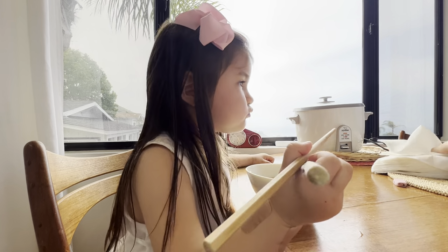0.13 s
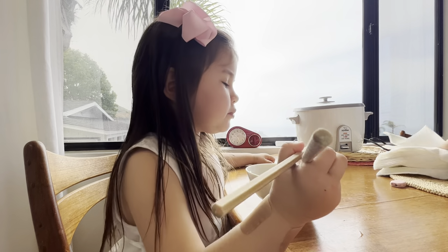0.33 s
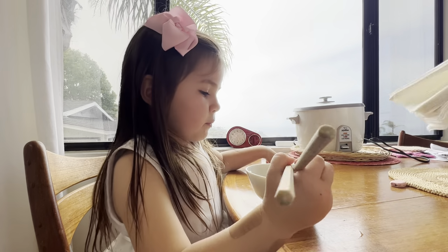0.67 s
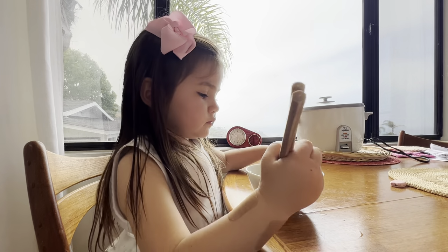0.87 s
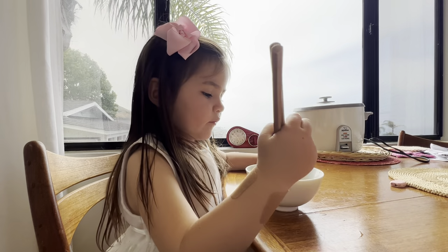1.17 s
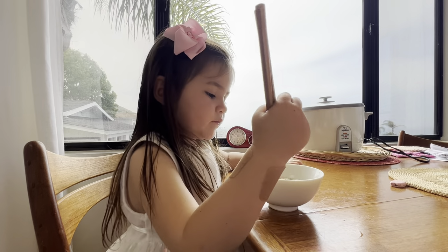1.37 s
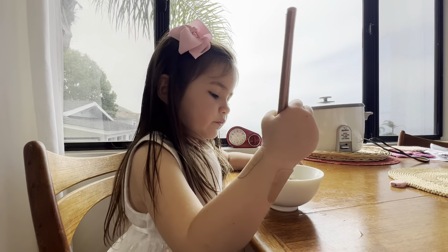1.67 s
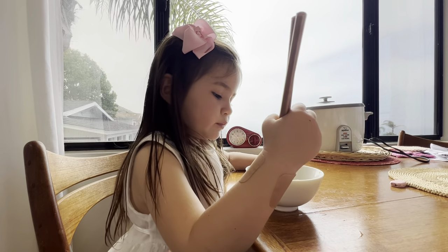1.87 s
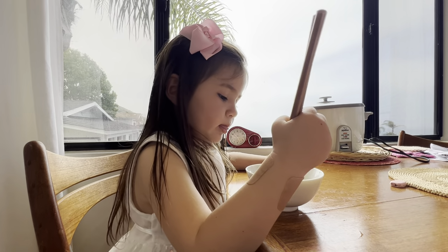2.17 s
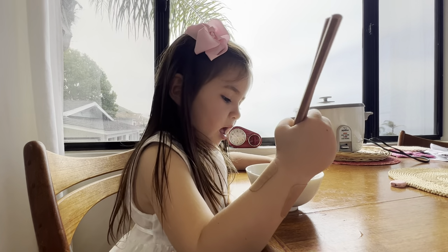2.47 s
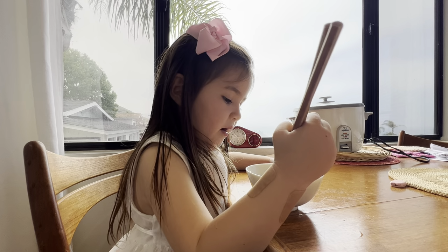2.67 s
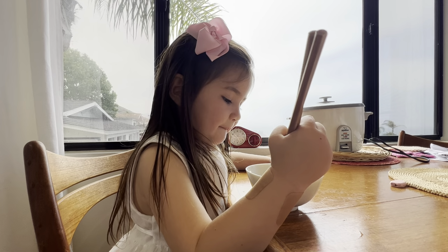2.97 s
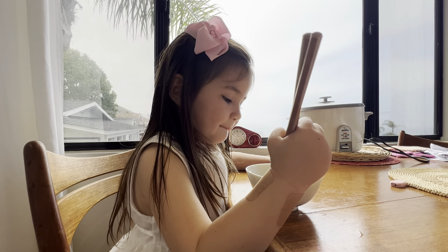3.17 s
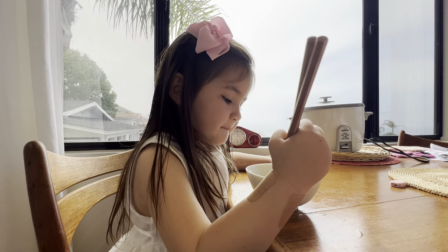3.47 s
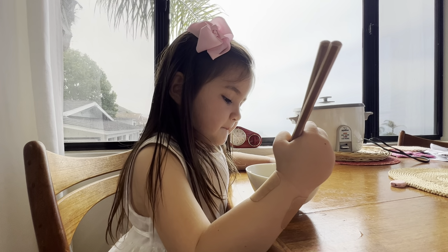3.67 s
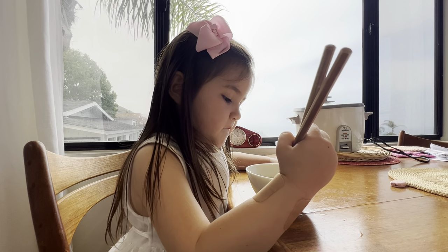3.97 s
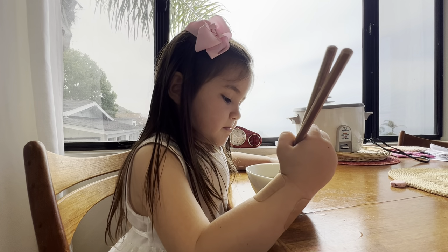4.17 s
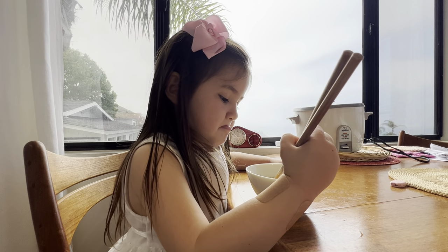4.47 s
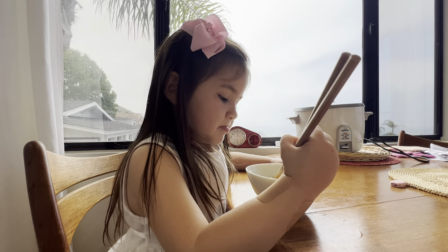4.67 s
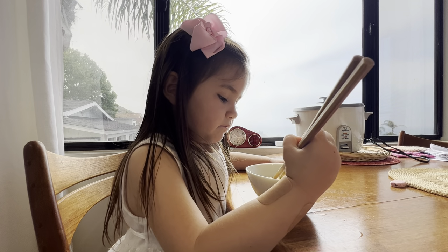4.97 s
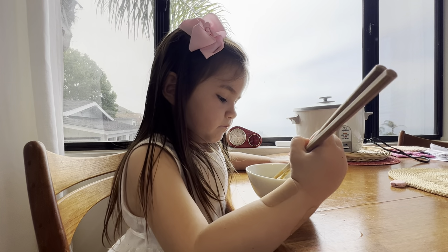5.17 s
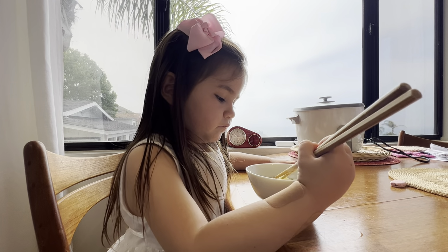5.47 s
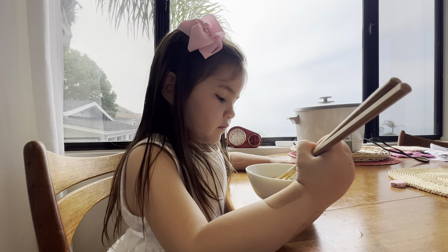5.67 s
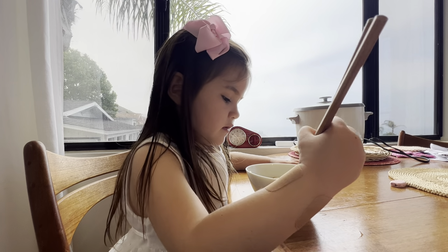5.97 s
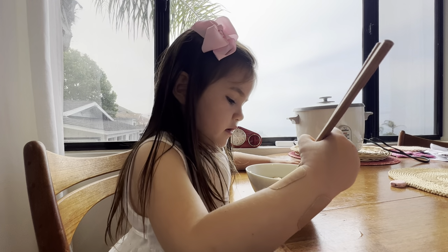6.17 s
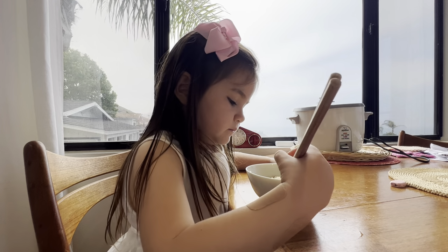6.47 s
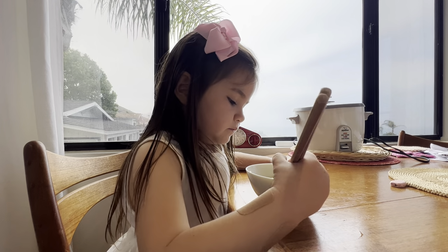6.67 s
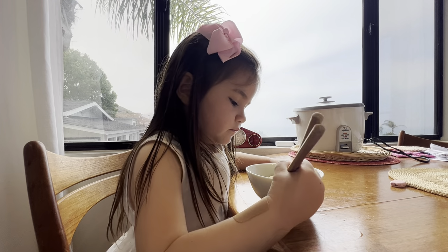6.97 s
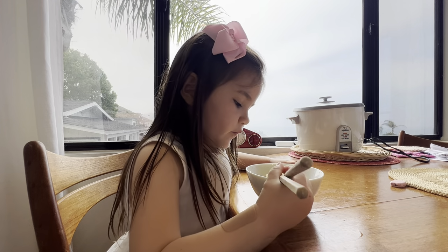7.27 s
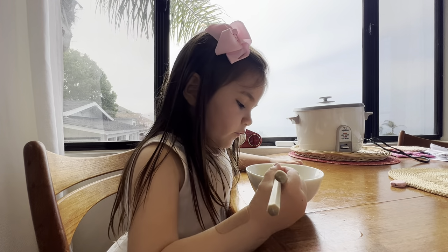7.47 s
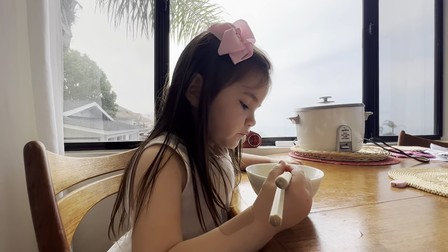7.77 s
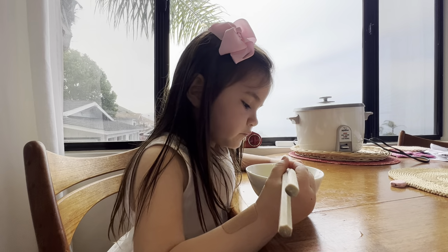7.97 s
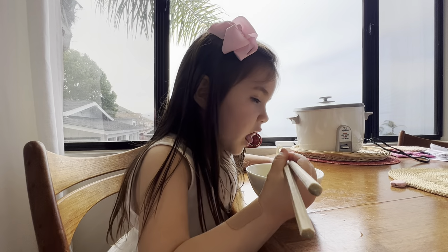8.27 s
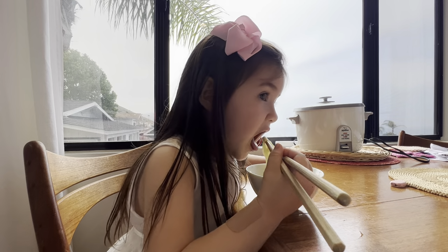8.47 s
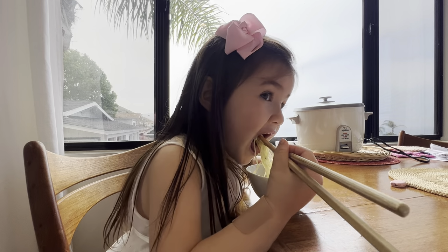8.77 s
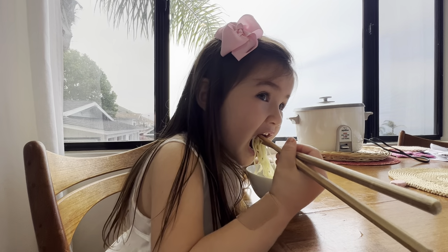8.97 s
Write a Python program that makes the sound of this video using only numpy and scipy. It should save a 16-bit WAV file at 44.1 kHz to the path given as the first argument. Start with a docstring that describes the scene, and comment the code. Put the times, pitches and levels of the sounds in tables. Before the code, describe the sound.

Close quiet handling sounds at a wooden table: fabric rustle, one napkin snap, a low thump, chopsticks skidding and tapping against a bowl.

```python
"""Cloth and skin rustle close by in a quietly humming room; dry ticks and chopsticks on a ceramic bowl follow.
A napkin is shaken out, something heavy lands on a wooden table, and the sticks strike and scrape the bowl.
Friction is coloured noise under gesture envelopes; taps and thuds are sums of decaying tones; ticks are
short dispersed noise bursts. A phone's two microphone ports, an arm's length away, hear the treble differently."""
import sys
import numpy as np
from scipy import signal
from scipy.fft import rfft, irfft
from scipy.io import wavfile
from scipy.ndimage import uniform_filter1d

SR = 44100
rng = np.random.default_rng(int(sys.argv[2]) if len(sys.argv) > 2 else 0)


def generate_wav(sig):
    """Save sig (samples, or channels by samples) to the path in sys.argv[1] as 16-bit PCM at SR."""
    pcm = np.round(np.clip(np.atleast_2d(sig).T, -1, 1) * 32767).astype(np.int16)
    wavfile.write(sys.argv[1], SR, pcm)


N = 401744
T = np.arange(N) / SR  # time of each sample, s
HZ = np.maximum(np.arange(N // 2 + 1) * SR / N, 1)  # frequency of each spectral bin


def amp(db):
    """Level to gain: twenty decibels are a factor of ten in pressure."""
    return 10 ** (np.asarray(db) / 20)


def over_hz(table):
    """Frequency response: (frequency, value) points joined along a logarithmic frequency axis."""
    hz, value = np.transpose(table)
    return np.interp(np.log(HZ), np.log(hz), value)


def colour(x, table):
    """Linear filtering: shape the spectrum of x by a table, then scale to rms 1."""
    y = irfft(rfft(x) * amp(over_hz(table)), N)
    return y / np.sqrt(np.mean(y ** 2))


def partly_shared(a, b, likeness):
    """Correlation: mix independent a and b into a partner of a with the given likeness and equal power."""
    return likeness * a + np.sqrt(1 - likeness * likeness) * b


def walk(rate):
    """Slow modulation: random levels held for 1 / rate seconds and smoothed twice."""
    hold = int(SR / rate)
    steps = np.repeat(rng.standard_normal(N // hold + 1), hold)
    return 1.66 * uniform_filter1d(uniform_filter1d(steps, hold), hold)[:N]


def grit(scatter_db, likeness, lag_ms):
    """Friction noise: grains of uneven size, partly shared by the ports, the left one lag_ms late."""
    grains = np.minimum(rng.exponential(size=N // 40 + 1), 3)
    size = amp(scatter_db * uniform_filter1d(np.repeat(grains, 40)[:N], size=30))
    a, b = rng.standard_normal((2, N))
    left = np.roll(a * size, int(lag_ms * SR / 1000))
    return np.array([left, partly_shared(a, b, likeness) * size])


def gesture(t, s, length, db, grows, rise, fall):
    """Exponential envelope: rises to its start, grows while it lasts, falls after; slopes in dB per second."""
    end = s + length
    growth_db = grows * (end - np.clip(t, s, end))
    return amp(db - growth_db - rise * np.clip(s - t, 0, 1) - fall * np.clip(t - end, 0, 1))


def together(rows, grows, rise, fall):
    """Incoherent addition: the powers of (start [s], length [s], level [dB]) gestures sum."""
    t = T[::32]
    power = sum(gesture(t, s, length, db, grows, rise, fall) ** 2 for s, length, db in rows)
    return np.interp(T, t, np.sqrt(power))


def ring(hz, db, decay, signs):
    """Modal superposition: decaying sines of a struck body, peak 1; decay in dB per second."""
    t = T[:SR // 2, None]
    y = (signs * amp(db - decay * t) * np.sin(2 * np.pi * hz * t)).sum(axis=1)
    return y / np.abs(y).max()


def add(out, s, sound, pan_db, lag_ms):
    """Level and time differences: place a hit at s; left delayed by lag_ms, right by a fixed 0.12 ms."""
    for side, sign, late in ((0, 0.91, lag_ms / 1000), (1, -1.1, 0.00012)):
        i = int((s + late) * SR)
        out[side, i:i + len(sound)] += amp(sign * pan_db / 2) * sound[:N - i]


def room_tone():
    """Diffuse field: noise shared by the ports in the bass, opposed near 800 Hz by their spacing."""
    # likeness of the ports: (frequency [Hz], left-right correlation)
    room_likeness = [(200, 0.85), (400, 0.12), (800, -0.39), (1500, -0.07), (3000, -0.08)]
    # relative spectra of the layers: (frequency [Hz], density [dB per Hz])
    rumble_tone = [(20, -41), (35, -7.5), (64, -2.5), (107, -4), (160, -12), (220, -28), (300, -72)]
    drone_tone = [(110, -43), (170, -7), (205, -3.5), (222, 5), (245, -3), (300, -8), (450, -18.5),
                  (600, -47)]
    air_tone = [(240, -28), (400, -15), (854, -6), (1200, -9.5), (1500, -13.5), (3000, -37), (3900, -54.5),
                (6600, -120)]
    band_tone = [(600, -33), (700, 1.5), (730, 5), (790, -1.5), (850, -24), (980, -60)]
    hiss_tone = [(1500, -21), (2500, -19), (4300, -8.5), (6400, -4), (7350, 6), (8200, -7), (9300, -6),
                 (10500, -42), (12000, -50.5)]
    # rumble, drone and air, slowly growing quieter: (level at the start [dB], fall [dB/s], flicker [dB])
    room_layers = [(-56.5, 0.6, 1.5), (-54.5, 1.26, 0.6), (-53.5, 0.92, 0.97)]
    # the bass grows fuller for a while: (start [s], length [s], rumble level [dB])
    bass_swells = [(0, 0.49, -60), (3.45, 0.25, -58), (4.0, 0.42, -63)]
    # a narrow band near 750 Hz swells now and then: (start [s], length [s], level before flicker [dB])
    band_swells = [(1.45, 1, -66), (4.35, 0.31, -63.5), (5.5, 0.27, -61.5)]
    band_rest_db, band_slope_db_per_s, hiss_db = -82.5, 65, -74.5

    a, b = rfft(rng.standard_normal((2, N)))
    likeness = np.clip(over_hz(room_likeness), -1, 1)
    noise = irfft(np.array([a, partly_shared(a, b, likeness)]), N)
    rumble, drone = colour(noise, rumble_tone), colour(noise, drone_tone)
    out = amp(hiss_db) * colour(noise, hiss_tone)
    for (db, fall, flicker_db), layer in zip(room_layers, (rumble, drone, colour(noise, air_tone))):
        out += amp(db - fall * T + flicker_db * walk(6)) * layer
    out += together(bass_swells, 0, 90, 90) * (rumble + amp(-15) * drone)
    band = amp(band_rest_db) + together(band_swells, 0, band_slope_db_per_s, band_slope_db_per_s)
    return out + band * amp(2 * walk(6)) * colour(noise, band_tone)


def rustle():
    """Dry friction: fibres catch and let go by the thousand, in a fine and a coarse grain."""
    # relative spectra of the grains: (frequency [Hz], density [dB per Hz])
    fine_tone = [(2500, -15), (4000, -14), (5400, -7), (7300, -3), (9200, -5), (10300, -17.5),
                 (11500, -28.5), (13500, -51), (15000, -44.5)]
    coarse_tone = [(900, -6), (1600, -6.5), (2500, -10.5), (3600, -13), (4600, -13.5), (7000, -24.5),
                   (10000, -80.5)]
    crisp_tone = [(9000, -31), (11500, -2), (13500, -13), (15200, -0.5)]
    # cloth and skin in light contact, levels before flicker and pan:
    # (start [s], length [s], fine rustle [dB], coarse rub minus fine [dB])
    contact = [(0, 1.475, -64, 1), (1.73, 1.33, -66.5, -2), (3.76, 1.43, -63, -3),
               (5.1, 2.505, -64.5, -2.5), (7.82, 0.59, -66.5, -3)]
    # strokes of cloth and skin sliding, levels at their end before flicker and pan:
    # (start [s], length [s], fine rustle [dB], coarse rub minus fine [dB])
    strokes = [(.05, 0.14, -62, 5.5), (.33, 0.19, -54, 2), (.55, 0.093, -55, -3.5), (.9, 0.12, -56.5, -3),
               (1.1, 0.24, -52, -0.5), (1.82, 0.082, -65, 7.5), (1.93, 0.16, -55, -0.5),
               (2.25, 0.067, -58, -2), (2.43, 0.024, -52.5, 4.5), (2.57, 0.0063, -53, -8),
               (2.68, 0.033, -59.5, -3), (2.78, 0.017, -54.5, -6), (3.06, 0.082, -60, -20),
               (3.2, 0.12, -62.5, -1), (3.33, 0.046, -47.5, -10), (3.43, 0.14, -44, -10.5),
               (3.64, 0.035, -63.5, 0), (3.86, 0.027, -51.5, -6), (3.93, 0.09, -46.5, -13),
               (4.11, 0.048, -60.5, -5), (4.23, 0.1, -54.5, -3), (4.37, 0.22, -45, -6),
               (4.82, 0.084, -52.5, -6.5), (5.07, 0.013, -60.5, -1), (5.26, 0.14, -55, -3.5),
               (5.465, 0.02, -59.5, -14), (5.64, 0.05, -56.5, -27), (5.89, 0.041, -60.5, -26),
               (6.015, 0.017, -59, -4), (6.08, 0.069, -60.5, 2.5), (6.22, 0.16, -57.5, 1.5),
               (6.53, 0.012, -60.5, 0), (6.65, 0.066, -60.5, -2), (6.855, 0.03, -62, -2),
               (6.92, 0.03, -61, -6), (7.09, 0.013, -59, -3), (7.32, 0.084, -54.5, -12),
               (7.49, 0.026, -58.5, -5.5), (7.66, 0.06, -65, -3.5), (7.88, 0.027, -57, -22),
               (8.055, 0.029, -53, -21), (8.15, 0.023, -60, -19), (8.228, 0.049, -48.5, -13),
               (8.315, 0.025, -62, -4)]
    # place of the rustle, before the ports' own difference: (time [s], left minus right [dB])
    rustle_pan = [(0, -8.5), (.8, -9), (2.2, -7), (3, -4), (5.7, -1.4), (7.5, 1.5), (8.2, -4)]
    grows, rise, fall = 17, 278, 297  # dB per second
    crisp_until_s, crisp_db = 1.2, -77.5  # the napkin rustles crisply while it is handled

    def level(coarse):
        """Power sum of contact and strokes, for the fine (0) or coarse (1) grain."""
        gains = []
        for rows, growth in ((contact, 0), (strokes, grows)):
            moves = [(s, length, db + coarse * rub_db) for s, length, db, rub_db in rows]
            gains.append(together(moves, growth, rise, fall))
        return np.hypot(*gains)

    noise = grit(scatter_db=2.0, likeness=0.2, lag_ms=.2)
    cloth = level(0) * colour(noise, fine_tone)
    cloth += level(1) * amp(walk(14)) * colour(noise, coarse_tone)
    cloth += together([(0, crisp_until_s, crisp_db)], 0, rise, fall) * colour(noise, crisp_tone)
    pan_db = np.interp(T, *np.transpose(rustle_pan))
    flicker_db = 0.9 * walk(25)  # all grains flicker together
    return cloth * amp(flicker_db + np.array([pan_db, -pan_db]) / 2)


def napkin():
    """Broadband impulse noise: a crackling flap from the right with a push of air below."""
    # relative spectrum of the flap: (frequency [Hz], density [dB per Hz])
    napkin_colour = [(30, -3.5), (70, -1), (120, -9), (220, -1), (500, -11.5), (1100, -7), (1900, -8),
                     (2900, -16.5), (5800, -13.5), (9500, -24.5), (13500, -36), (15300, -38)]
    start_s, hold_s, rise_db_per_s = 1.172, 0.026, 3000
    flap = colour(grit(scatter_db=2.0, likeness=0.29, lag_ms=.42), napkin_colour)
    snap = gesture(T, start_s, hold_s, -25.5, 0, rise_db_per_s, 338)
    flutter = gesture(T, start_s, hold_s, -35.5, 0, rise_db_per_s, 155)  # loose cloth settles more slowly
    return flap * (snap + flutter) * amp(np.array([[-2.5], [2.5]]))


def thuds():
    """Modal excitation: a heavy thing lands and rocks, the table rings low and unevenly, wood cracks above."""
    # blows on the table top, levels before contact smoothing and bass cut:
    # (time [s], ring peak [dB], push [ms], crack level [dB], crack t60 [s])
    blows = [(2.404, -10.5, 0.6, -27.5, 0.14), (2.409, -9.5, 1.45, -32.5, 0.11),
             (2.426, -8.5, 1.15, -36, 0.23), (2.469, -17, 2.42, -46, 0.44), (2.62, -35.5, 1.6, -62, 0.18)]
    # modes of the table top: (frequency [Hz], relative level [dB], t60 before throbbing [s])
    table_modes = [(120.3, -21, 0.42), (162, -15, 0.34), (175, -10, 0.44), (218, -20, 0.25),
                   (255.4, -2, 0.3), (296.3, -3.5, 0.18), (315, -15, 0.2), (331, -13.5, 0.3),
                   (356.4, -18, 0.27), (412, -21, 0.18), (453, -17, 0.26), (546.4, -13.5, 0.25),
                   (735, -31, 0.21), (825, -17, 0.19), (1380, -12, 0.16)]
    # relative spectrum of cracking wood: (frequency [Hz], density [dB per Hz])
    crack_tone = [(60, -27), (110, 2), (250, 5.5), (500, 5), (900, -5), (1400, -7), (2500, -20.5),
                  (5000, -29), (12000, -52)]
    boom_s, boom_db, boom_hz, boom_t60_s = 2.41, -18, (71.5, 82.8), 0.37
    throb_db = 3

    out = np.zeros((2, N))
    hz, mode_db, t60 = np.transpose(table_modes)
    # the floor answers with two close modes that start opposed, so the boom swells late and beats
    boom = ring(np.array(boom_hz), 0, 60 / boom_t60_s, np.array([1, -1]))
    add(out, boom_s, amp(boom_db) * boom, 2.5, 0)
    crack = colour(grit(scatter_db=3.5, likeness=0.79, lag_ms=0), crack_tone)
    # things rattling on the top make each mode throb in its own way once the load has landed
    onset = np.clip((T[:SR, None] - .03) * 30, 0, 1)
    throb = amp(throb_db * np.transpose([walk(30)[:SR] for _ in hz]) * onset)
    for k, (s, db, push_ms, crack_db, crack_t60) in enumerate(blows):
        push = np.hanning(int(push_ms * SR / 1000) + 3)  # a soft contact pushes longer and dulls the ring
        # each landing point moves the modes differently
        signs = np.cos(np.pi * (k + 1) * (np.arange(len(hz)) + 1) / 1.3)
        since = max(int((s - blows[0][0]) * SR), 0)
        body = ring(hz, mode_db, 60 / t60, signs * throb[since:since + SR // 2])
        add(out, s, amp(db) * np.convolve(body, push / push.sum()), 2.5, -.5)
        crack_decay = amp(crack_db - 60 * np.clip(T - s, 0, 1) / crack_t60)
        out += crack * np.clip((T - s) / 0.0012, 0, 1) * crack_decay
    # the whole thud, boom included, has little below 67 Hz
    return signal.sosfilt(signal.butter(4, 67., "high", fs=SR, output="sos"), out)


def scrape():
    """Stick-slip of wood on glaze: the damped bowl colours it, the table carries its lows to the right port."""
    # relative spectra at the two ports: (frequency [Hz], density [dB per Hz])
    scrape_left = [(150, -1.5), (300, -4.5), (754, -4.5), (1100, -3.5), (1560, 6), (2300, -7.5),
                   (3400, -4.5), (7000, -0.5), (9500, -6.5), (12000, -41), (13500, -19), (15000, -42)]
    scrape_right = [(150, -2), (300, -8.5), (754, 1), (1100, -7.5), (1560, -1), (2300, -10.5), (3400, 1),
                    (5500, -5.5), (9000, -9), (12000, -30), (13500, -47), (15000, -26)]
    # the sticks catch and jump while they skid: (time [s], level before the port gains [dB])
    slips = [(4.587, -25), (4.596, -43), (4.606, -30.5), (4.616, -25.5), (4.624, -26.5), (4.645, -26.5),
             (4.657, -31.5)]
    noise = grit(scatter_db=2.5, likeness=0.58, lag_ms=-.1)
    left = colour(noise[0], scrape_left) * amp(4.0)
    right = colour(noise[1], scrape_right) * amp(6.5)
    skid = gesture(T, 4.584, 0.0727, -35, 0, 1200, 1802)
    jumps = together([(s, 0, db) for s, db in slips], 0, 3999, 1500.5)
    return np.array([left, right]) * np.hypot(skid, jumps)


def dry_ticks():
    """Impact transient: one sharp contact and a dying noise burst, dispersed so the treble arrives first."""
    # levels and pans before the treble colour:
    # (time [s], peak [dB], centre [Hz], half-width at -12 dB [octaves], t60 [s], left minus right [dB])
    ticks = [(0.144, -35, 493, 1.77, 0.017, -7), (.453, -35.5, 6030, 1.5, 0.012, -10),
             (.539, -26, 7600, 0.84, 0.017, -2), (0.563, -42, 2280, 0.49, 0.014, 4.5),
             (.571, -42, 4500, 0.98, .01, -4), (.614, -36.5, 2960, 2.4, 0.021, -5),
             (0.623, -43, 2480, .4, .012, 3), (0.641, -43, 2400, 0.76, .01, 9),
             (.697, -41, 3000, 1.7, 0.012, -4), (1.018, -43, 2350, 0.46, 0.035, 4),
             (1.054, -42.5, 2520, 0.44, 0.024, 0), (1.107, -40.5, 2580, 1.8, 0.012, 10),
             (1.324, -28, 6270, 2.1, 0.02, -9), (2.418, -37, 4750, 0.98, 0.029, 7),
             (4.550, -37, 7000, 0.45, .012, 2), (4.567, -20, 6400, 0.93, 0.033, 2.5),
             (3.761, -42, 810, 1, 0.019, -7), (6.209, -43.5, 2300, 0.83, 0.012, 3),
             (6.330, -43, 1190, 0.32, 0.018, -2), (6.430, -35, 1890, 1.1, 0.01, 2),
             (6.860, -39.5, 2480, 2.3, 0.014, 2.5), (6.874, -42, 8550, 0.32, 0.011, 3),
             (6.973, -44, 2200, 0.78, 0.011, 1), (7.038, -40.5, 5770, 0.79, 0.012, 6),
             (7.044, -43.5, 1400, 0.51, 0.07, 2.5), (7.393, -40, 6460, 1.1, 0.011, 1),
             (8.039, -19.5, 5260, 1.5, 0.0089, 4), (8.058, -35, 8000, 0.6, .01, 0),
             (8.213, -25, 6370, 0.62, 0.02, -9.5), (8.214, -36, 2860, 0.74, 0.019, -5),
             (8.306, -35, 7000, 0.73, 0.02, 0), (8.309, -37.5, 1000, 1.75, 0.061, 5)]
    snap = 6  # first contact, relative to the rms of the burst
    spread_s = 0.0004  # extra delay for each octave below the centre
    size, lead = 2048, 256  # samples; lead leaves room ahead of the tick
    out, t = np.zeros((2, N)), T[:size]
    bins_hz = np.arange(1, size // 2 + 2) * SR / size
    for s, db, centre_hz, width, t60, pan_db in ticks:
        knock = rng.standard_normal(size) * amp(-60 * t / t60) + snap * (t == 0)
        octave = np.log2(bins_hz / centre_hz)
        late = lead / SR + 1 / 1000 + spread_s * np.clip(-octave, -1, 2)
        # phase is the running sum of group delay over frequency
        delay = np.exp(-2j * np.pi * np.cumsum(late) * SR / size)
        tick = irfft(rfft(knock) * delay / (1 + (octave / width) ** 2) ** 2)
        add(out, s - lead / SR, amp(db) * tick / np.abs(tick).max(), pan_db, -.1)
    return out


def bowl_taps():
    """Damped vibration: sticks strike the bowl, and a hand on it chokes the low tones first."""
    # sticks on the bowl, levels before the soft onset and the treble colour:
    # (time [s], peak [dB], damping by the hand at 1500 Hz [dB/s], hardness [dB per octave], left minus right [dB])
    taps = [(0.665, -29, 15, 0.5, 3), (4.584, -24.5, 600, 0.5, 5), (6.429, -32.5, 900, -2, -7)]
    # modes heard under the taps; the lowest, 910 Hz, is a short low knock at the first tap:
    # (frequency [Hz], relative level [dB], t60 without the hand [s])
    tap_modes = [(910, -1.5, 0.06), (1550, 4, 0.063), (1556, -8, 0.27), (3615, -4, 0.077),
                 (3610, -17, 0.27), (6210, -11.5, 0.085)]
    rise_s = 0.003
    out = np.zeros((2, N))
    hz, mode_db, t60 = np.transpose(tap_modes)
    for s, db, grip, hard_db, pan_db in taps:
        struck_db = mode_db + hard_db * np.log2(hz / 1500)
        body = ring(hz, struck_db, 60 / t60 + grip * (1500 / hz) ** 3, 1)
        add(out, s, amp(db) * body * np.minimum(T[:len(body)] / rise_s, 1), pan_db, .1)
    return out


def clinks():
    """Spectral shaping: treble colour of the taps and ticks, with dips near 10.5 and 13.5 kHz."""
    # treble colour, constant beyond its ends: (frequency [Hz], gain [dB])
    treble_colour = [(9000, 3.5), (10500, -11.5), (12000, -1), (13500, -22), (15000, -3.5)]
    return irfft(rfft(dry_ticks() + bowl_taps()) * amp(over_hz(treble_colour)), N)


def wall_echo(near):
    """Late reverberation: convolution with decaying noise, dulled by a one-pole low-pass."""
    echo_db, echo_t60_s = -19, 0.32
    t = T[:SR // 2]
    walls = rng.standard_normal((2, len(t))) * amp(-60 * t / echo_t60_s) * (t > .004)
    walls = signal.lfilter([1], [1, -.6], walls)
    walls /= np.sqrt((walls ** 2).sum(axis=1, keepdims=True))
    return amp(echo_db) * signal.fftconvolve(near, walls, axes=1)[:, :N]


def hear_at_ports(sound):
    """Directional response: the ports split each frequency unequally at constant total gain power."""
    # difference of the ports: (frequency [Hz], left minus right [dB])
    port_difference = [(60, 2), (150, 2.5), (500, -1), (900, 4.5), (2500, 6), (3800, 10), (5600, 16),
                       (8000, 15), (11500, 0)]
    port_db = over_hz(port_difference)
    left = np.sqrt(2 / (1 + amp(-2 * port_db)))
    return irfft(rfft(sound) * np.array([left, left * amp(-port_db)]), N)


def scene():
    """Superposition: room tone and rustle stay dry, while the other near sounds also excite the walls."""
    background = room_tone() + rustle()
    near = napkin() + thuds() + scrape() + clinks()
    return hear_at_ports(background + near + wall_echo(near))


def record(dry):
    """Band limiting: the phone drops the deepest bass and cuts the top."""
    dry = signal.sosfilt(signal.butter(2, 28., "high", fs=SR, output="sos"), dry)
    return signal.sosfilt(signal.ellip(10, .2, 70, 15800, fs=SR, output="sos"), dry)


dry = scene()
out = record(dry)
generate_wav(out)
```